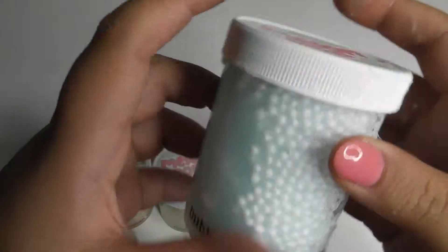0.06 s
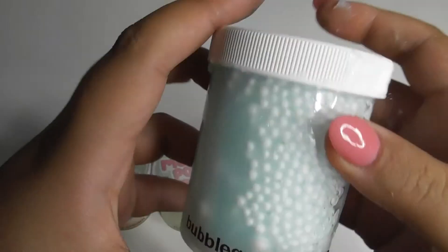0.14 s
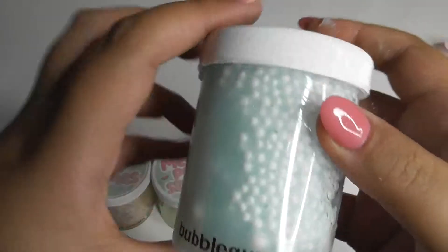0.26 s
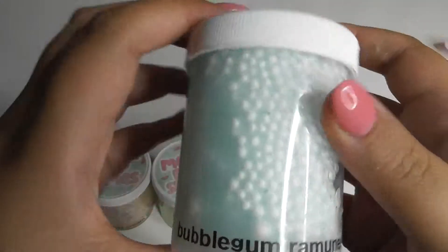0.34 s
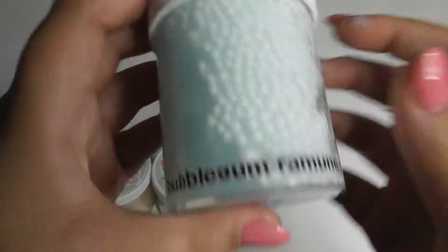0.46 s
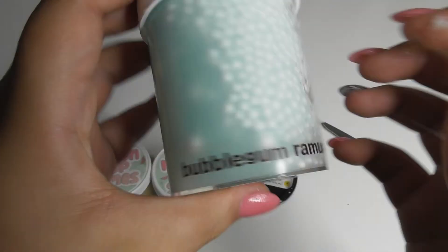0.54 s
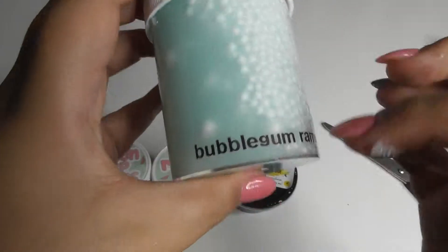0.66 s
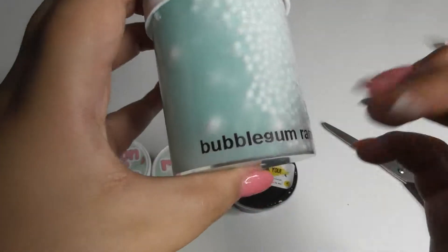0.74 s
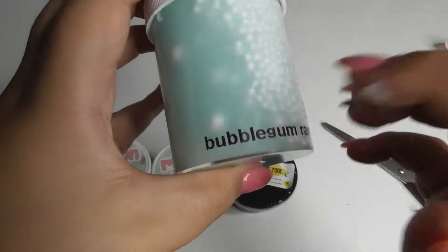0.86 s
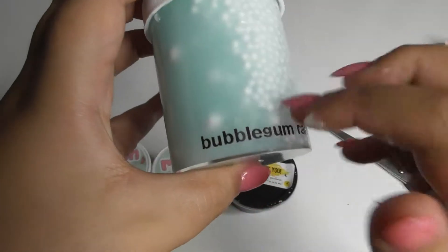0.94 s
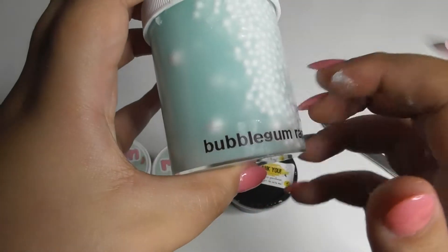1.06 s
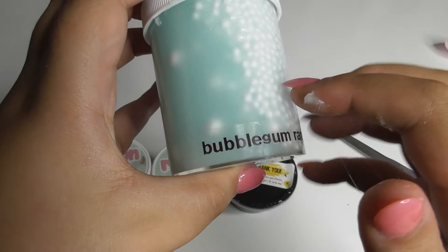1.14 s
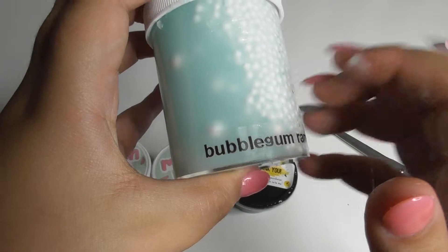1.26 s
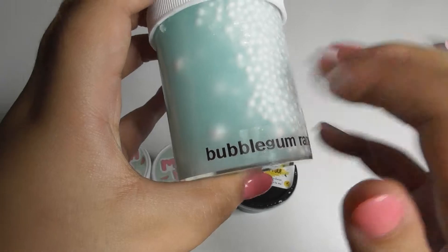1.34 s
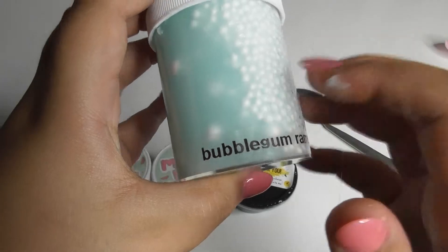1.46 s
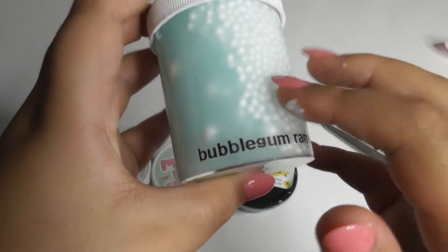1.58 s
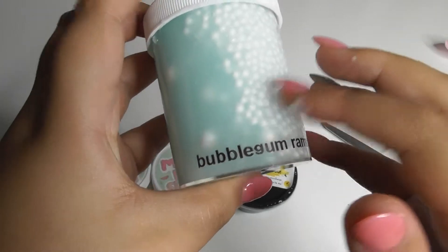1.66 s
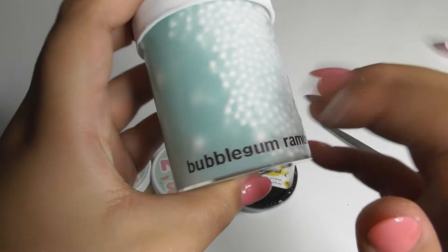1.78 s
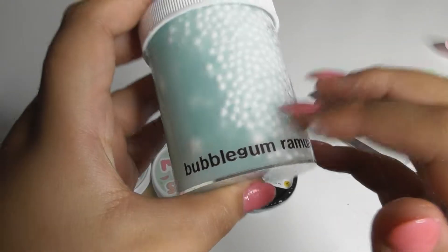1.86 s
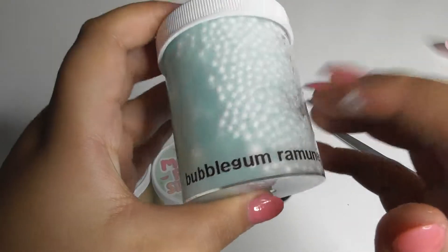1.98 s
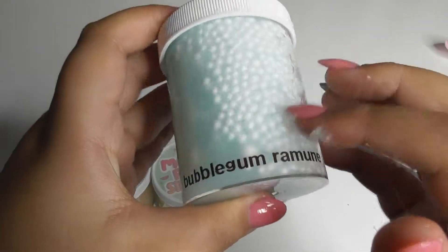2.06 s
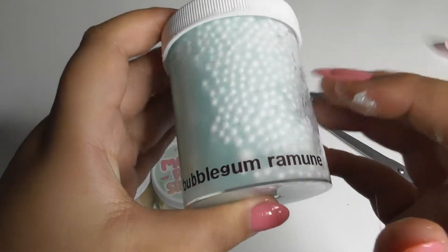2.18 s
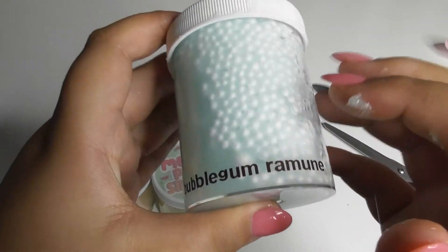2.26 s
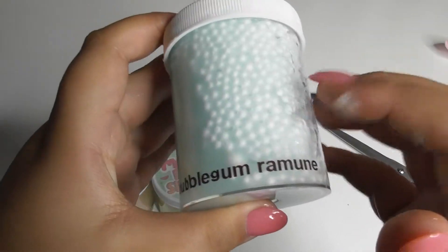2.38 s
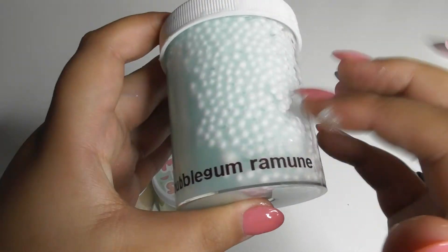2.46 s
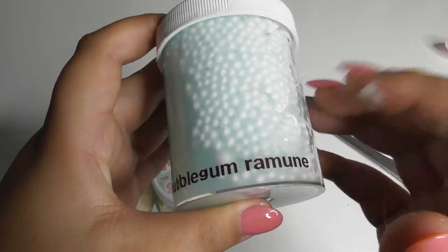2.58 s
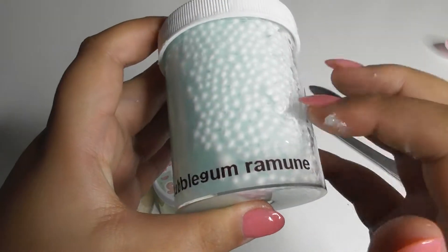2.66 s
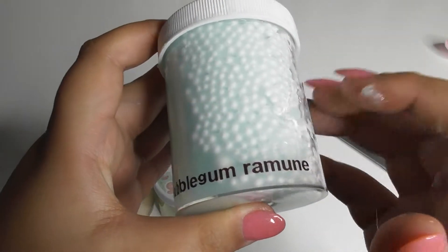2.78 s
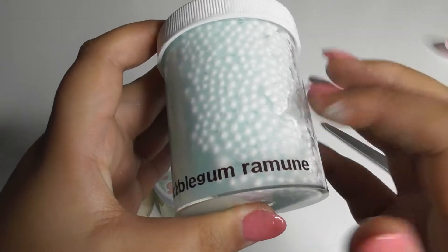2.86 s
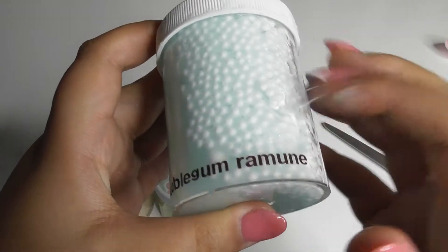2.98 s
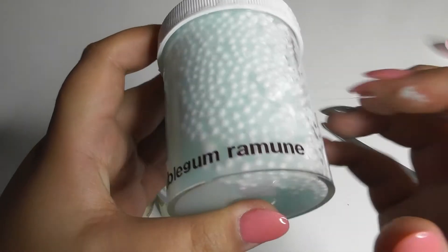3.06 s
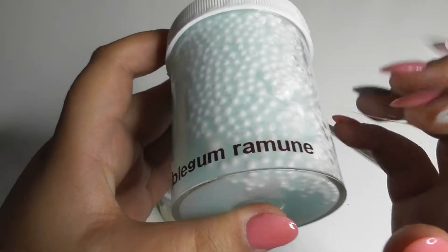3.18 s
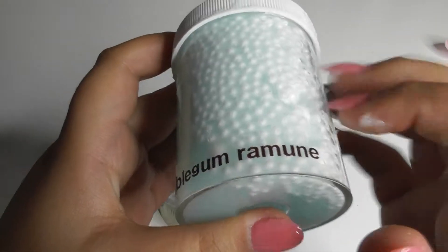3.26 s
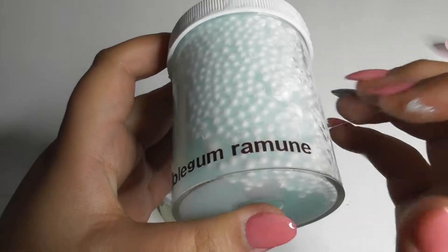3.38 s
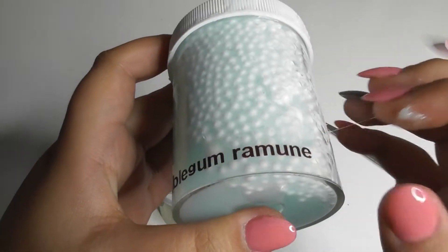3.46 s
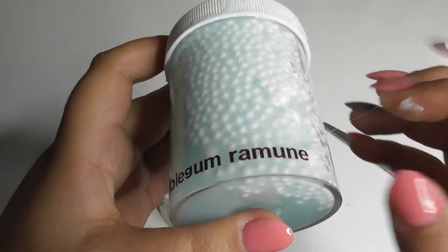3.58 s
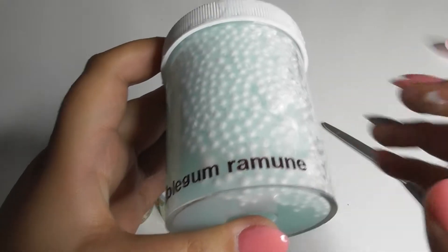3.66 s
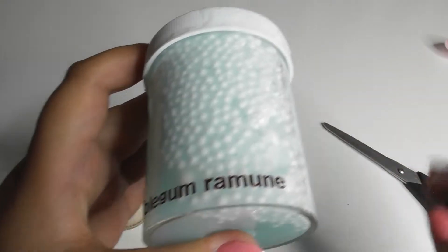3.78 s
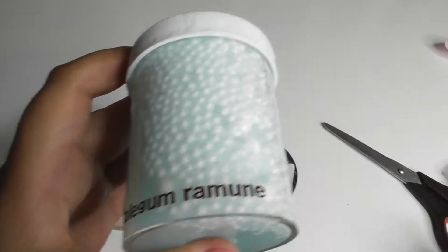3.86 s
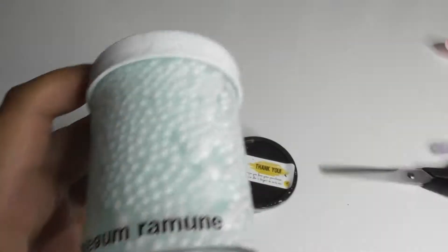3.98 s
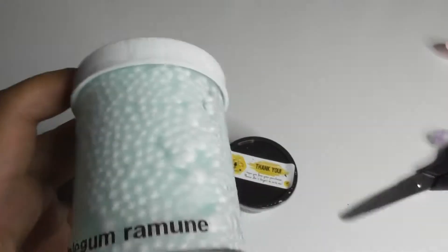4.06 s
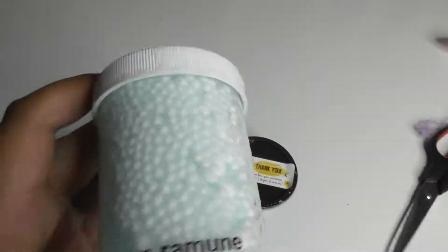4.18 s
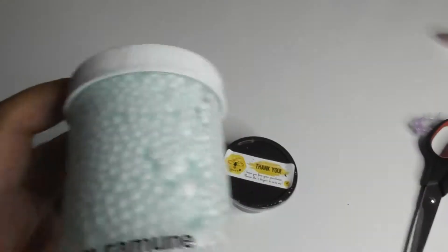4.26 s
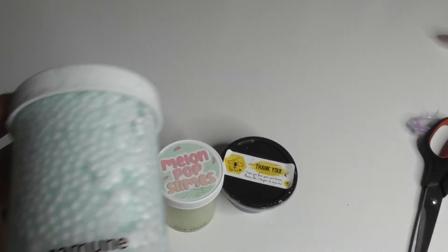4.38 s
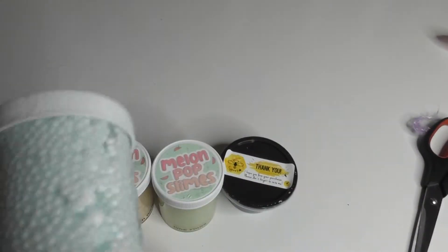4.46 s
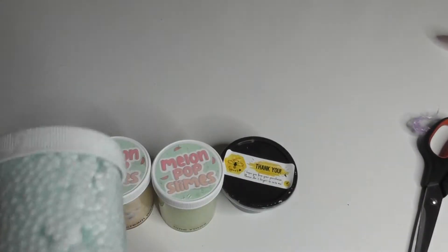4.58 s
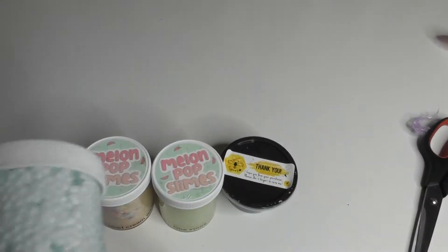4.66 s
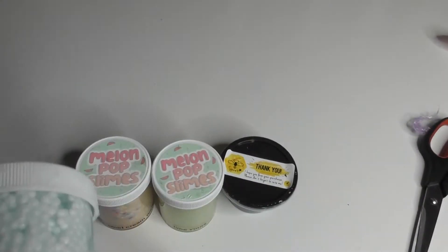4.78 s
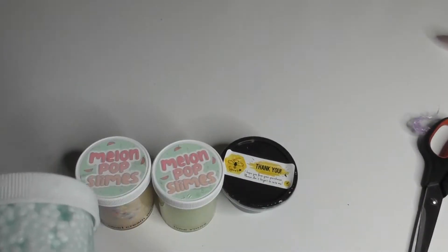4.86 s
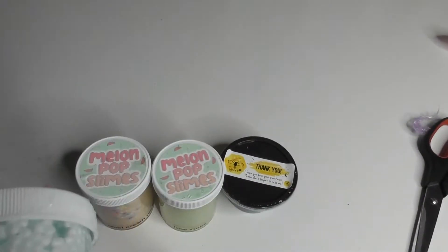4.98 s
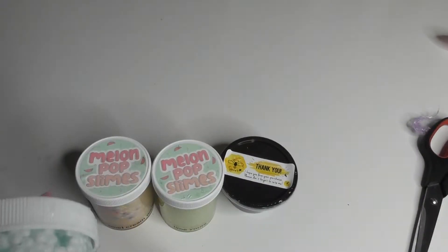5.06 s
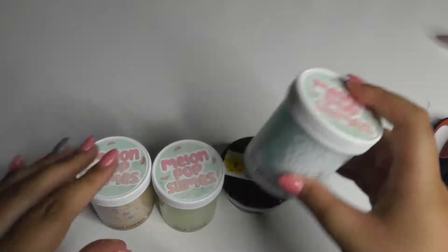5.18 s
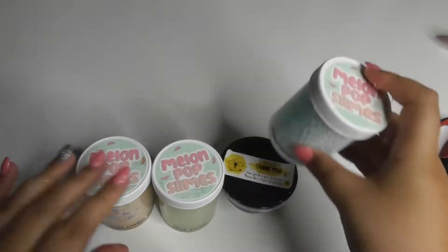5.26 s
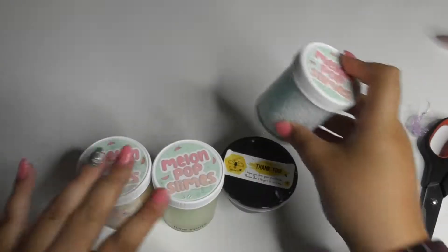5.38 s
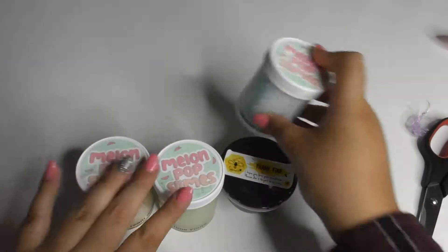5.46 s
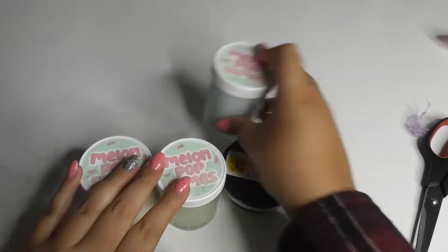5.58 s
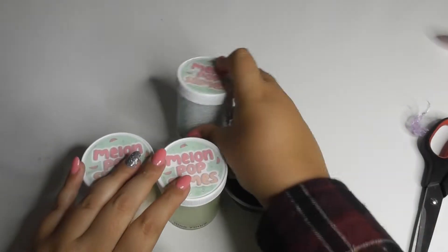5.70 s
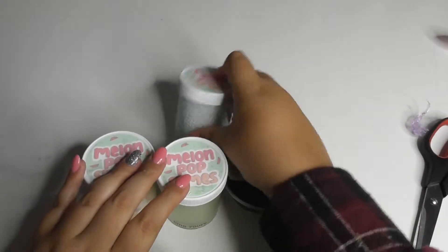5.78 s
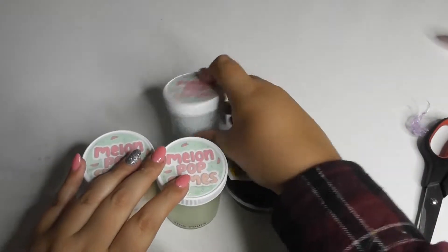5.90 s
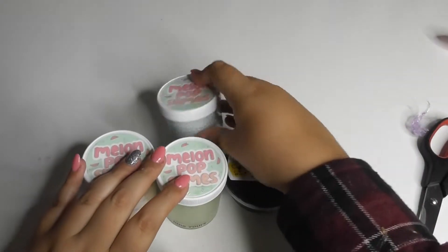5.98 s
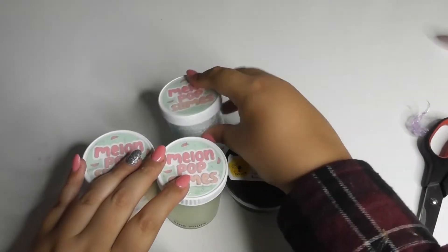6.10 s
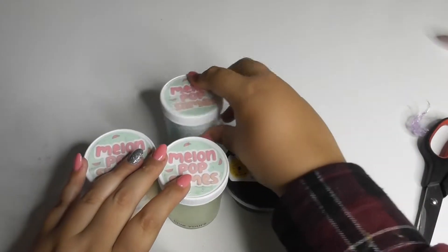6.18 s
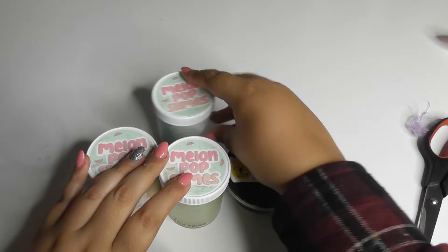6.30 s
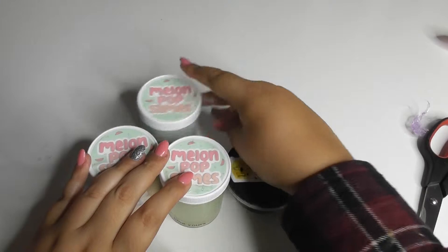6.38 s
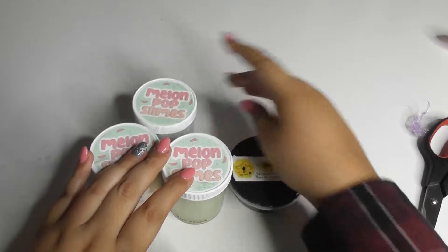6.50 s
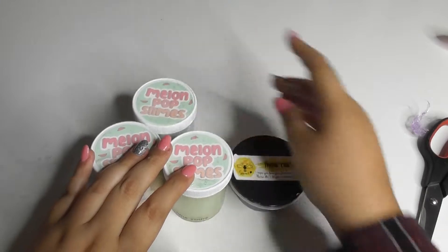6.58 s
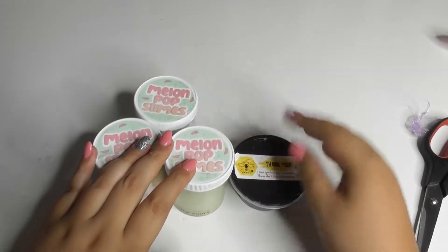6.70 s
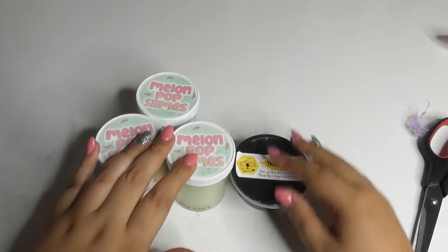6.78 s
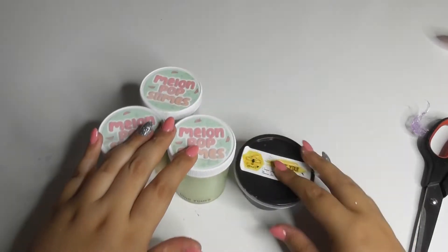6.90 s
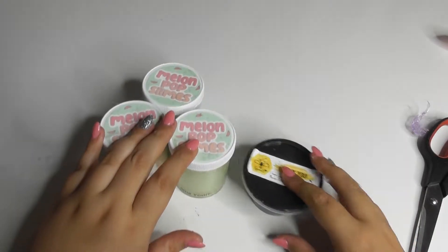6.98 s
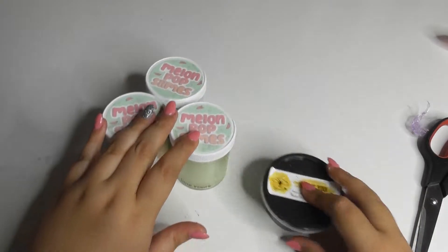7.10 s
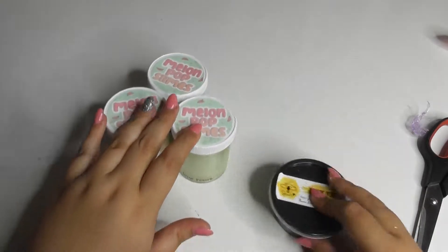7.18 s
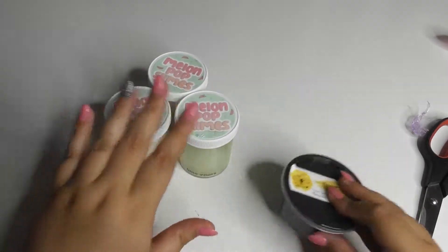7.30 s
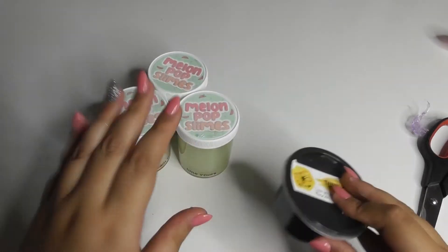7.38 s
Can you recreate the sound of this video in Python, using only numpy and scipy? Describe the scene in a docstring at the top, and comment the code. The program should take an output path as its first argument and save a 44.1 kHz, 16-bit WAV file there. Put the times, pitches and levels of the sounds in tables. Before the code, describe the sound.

In a quiet, faintly humming and hissing room, fingernails tap a filled plastic tub very close to the microphone, with bright irregular ticks and small hollow thuds. Scissors drop on the table with a quick clatter and are scraped aside. After a soft pause, small tubs slide and bump, one landing with a clear knock. Finally a wide tub drags across and judders to a boomy stop.

```python
"""A quiet room hums and hisses throughout, with soft rustles of skin and sleeves: filtered, wavering noise.
Fingernails pick at a plastic tub close to a small stereo microphone on a table: ticks, wall rings, thuds.
Scissors clatter down and are pushed aside: impulses excite decaying modes, and coloured noise scrapes.
After a thin squeak, small tubs slide and bump with drones, and one tub is set down with a knock.
Last a wide tub slides and judders to a stop; its stick-slip pulses make the tabletop boom."""
import sys
import numpy as np
from scipy import signal
from scipy.fft import rfft, irfft, next_fast_len
from scipy.io import wavfile

SR = 44100
rng = np.random.default_rng(int(sys.argv[2]) if len(sys.argv) > 2 else 0)


def to_wav(s):
    """Save 16-bit WAV."""
    ch = np.atleast_2d(s).T  # columns
    pcm = np.round(np.clip(ch, -1, 1) * 32767)  # PCM
    wavfile.write(sys.argv[1], SR, pcm.astype(np.int16))


N = 327927
TIME = np.arange(N) / SR


def from_db(db):
    """Decibels to gain."""
    return 10 ** (np.asarray(db) / 20)


def convolve(x, response):
    """Pass a sound through an impulse response."""
    return signal.oaconvolve(x, response)[:len(x)]


def colour(x, spectrum, depth=1):
    """Causal (minimum-phase) filter that follows (f/Hz, level/dB) points, levels scaled by depth."""
    hz, db = np.transpose(spectrum)
    size = 4096
    grid = np.maximum(np.fft.rfftfreq(size, 1 / SR), 1)
    level_db = depth * np.interp(np.log(grid), np.log(hz), db)
    cepstrum = irfft(np.log(from_db(level_db)))
    # folding the cepstrum forward makes the phase minimal
    cepstrum[1:size // 2] *= 2
    cepstrum[size // 2 + 1:] = 0
    return convolve(x, irfft(np.exp(rfft(cepstrum))))


def low_pass(x, hz):
    """Two-pole low-pass: softens a contact or darkens a sound."""
    sections = signal.butter(2, min(hz, SR / 2 - 1), fs=SR, output="sos")
    return signal.sosfilt(sections, x + 1e-18)


def resonance(x, hz, width_hz):
    """Two-pole band-pass with gain about 1 at its peak."""
    r = np.exp(-np.pi * width_hz / SR)
    feed = np.array([1, 0, -1]) * (1 - r * r) / 2
    feedback = [1, -2 * r * np.cos(2 * np.pi * hz / SR), r * r]
    return signal.lfilter(feed, feedback, x + 1e-18)


def rms_one(x):
    """Scale to rms 1."""
    return x / np.sqrt(np.mean(x ** 2) + 1e-20)


def drift(rate):
    """Random wander of rms 1, with `rate` new targets per second."""
    knots = rng.standard_normal(int(rate * N / SR) + 2)
    return rms_one(np.interp(TIME * rate, np.arange(len(knots)), knots))


def noise(flicker_db, rate):
    """White noise whose strength flickers."""
    return rng.standard_normal(N) * from_db(flicker_db * drift(rate))


def impulse(db):
    """One click at the head of a short stretch of silence."""
    return from_db(db) * signal.unit_impulse(SR // 10)


def add(track, s, sound):
    """Mix a sound in at time s."""
    at = max(round(s * SR), 0)
    track[at:at + len(sound)] += sound[:N - at]


def held(start, end, attack_s, release_s):
    """Envelope that rises, holds until the end time and dies away."""
    rise = np.clip((TIME - start) / attack_s, 0, 1)
    return rise * np.exp(-np.clip((TIME - end) / release_s, 0, 20))


# left-minus-right level at the microphone ports, before depth: (f/Hz, level/dB)
PORT_DIFFERENCE = [(35, -9.5), (70, -11), (115, -13), (200, -8), (380, -7), (700, 0.5), (1290, 1.5),
                   (4000, 0.5), (9000, 0), (16000, 5.5)]


def ports(x, depth):
    """Split to stereo: bass reaches the right port more strongly than the left."""
    left = colour(x, PORT_DIFFERENCE, depth / 2)
    right = colour(x, PORT_DIFFERENCE, -depth / 2)
    return np.array([left, right])


# course of the low room noise, before trim: (t/s, level/dB)
ROOM_NOISE_LEVEL = [(0.0, -47.5), (1.25, -50), (1.5, -55), (2.0, -58), (2.75, -53), (3.25, -57),
                    (3.8, -52.5), (4.45, -56.5), (5.4, -52), (6.05, -55)]
# spectrum of the low room noise: (f/Hz, level/dB)
RUMBLE_SPECTRUM = [(25, -3), (50, 9.5), (120, 2.5), (220, 0), (500, -2.5), (1000, -7), (1550, -20),
                   (2300, -23.5), (3200, -39.5), (7000, -32.5)]
# spectrum of the thin hiss: (f/Hz, level/dB)
AIR_SPECTRUM = [(1000, -15), (2500, 7.5), (4000, -0.5), (8000, -7.5), (12000, -4), (16000, -5)]


def background(rumble_db=2, hiss_db=-66, hiss_follows=.7, apart_db=-14):
    """Low room noise and a thin hiss waver slowly together, nearly alike in both channels."""
    s, db = np.transpose(ROOM_NOISE_LEVEL)
    low_db = np.interp(TIME, s, db)
    rumble = rms_one(colour(noise(flicker_db=-0.02, rate=14), RUMBLE_SPECTRUM))
    # a weak noise of opposite sign in the two channels
    apart = rms_one(colour(rng.standard_normal(N), RUMBLE_SPECTRUM)) * np.array([[1], [-1]])
    low = ports(rumble, depth=0.81) + from_db(apart_db) * apart
    hiss = rms_one(colour(noise(flicker_db=2.75, rate=8.8), AIR_SPECTRUM))
    hiss_level_db = hiss_db + hiss_follows * (low_db - db.mean())
    return from_db(rumble_db + low_db) * low + from_db(hiss_level_db) * hiss


# skin and sleeves brush softly while the hands move: (start t/s, end t/s, level/dB before trim)
HAND_RUSTLES = [(-0.1, 0.27, -54), (0.3, 1.667, -60.5), (2.12, 3.023, -57.5), (3.62, 3.913, -67),
                (4.402, 5.152, -58.5), (5.137, 5.543, -62)]
# spectrum of the brushing: (f/Hz, level/dB)
BRUSH_SPECTRUM = [(1000, -17), (2500, 4), (4000, -1.5), (8000, -3.5), (11000, -2), (16000, -6.5)]
# a fingertip squeaks faintly on a lid: (start t/s, end t/s, level/dB)
LID_SQUEAKS = [(5.24, 5.43, -72)]
RUSTLE_ATTACK_S, RUSTLE_RELEASE_S = 0.068, 0.016
SQUEAK_HZ, SQUEAK_WIDTH_HZ = 8000, 800   # width of each of two passes


def hands(rustle_db=-5):
    """Skin and cloth make wavering, coloured noise; the squeak is noise through a narrow resonance."""
    motion = sum(from_db(db + rustle_db) * held(start, end, RUSTLE_ATTACK_S, RUSTLE_RELEASE_S)
                 for start, end, db in HAND_RUSTLES)
    rustle = motion * rms_one(colour(noise(flicker_db=2.0, rate=28), BRUSH_SPECTRUM))
    grip = sum(from_db(db) * held(start, end, RUSTLE_ATTACK_S, RUSTLE_RELEASE_S)
               for start, end, db in LID_SQUEAKS)
    squeak = resonance(rng.standard_normal(N), SQUEAK_HZ, SQUEAK_WIDTH_HZ)
    squeak = resonance(squeak, SQUEAK_HZ, SQUEAK_WIDTH_HZ)
    return rustle + grip * rms_one(squeak)


def tick(db, hz, width_hz=2300, rim_hz=3900, rim_width_hz=700, rim_db=-15):
    """A hard contact rings for a few cycles in the treble, with a randomly varied lower partner."""
    detune, strength = rng.standard_normal(2)
    rim_hit = impulse(db + rim_db + 3.4 * strength)
    rim = resonance(rim_hit, rim_hz * (1 + 0.075 * detune), rim_width_hz)
    return resonance(impulse(db), hz, width_hz) + rim


# spectrum of the plastic wall's scattered ring: (f/Hz, level/dB)
SHELL_SPECTRUM = [(1000, -17.5), (2500, -17), (4000, -3.5), (6500, -0.5), (8500, -2.5), (12000, 0.5),
                  (16000, -7)]


def shell(db, t60):
    """The thin plastic wall scatters a blow into a brief dense ring, new at every touch."""
    t = TIME[:SR // 10]
    ring = colour(rng.standard_normal(len(t)) * from_db(-60 * t / t60), SHELL_SPECTRUM)
    return from_db(db) * ring / np.linalg.norm(ring)


# nail on the tub, levels before trim: (t/s, click level/dB, ring f/Hz, rim level/dB re click,
# nail overtone level/dB re click, wall thud level/dB)
NAIL_TAPS = [(0.127, -21, 8000, 5, -12, -27), (0.1577, 1, 8900, -16, -8, -8.5),
             (0.419, -22, 8900, -15, -7, -27), (0.4515, -18.5, 8510, -8, -2, -20),
             (0.8103, -19.5, 7930, -9, -9, -16), (0.9964, 11, 9500, -36, -22, -11),
             (1.0833, 9.5, 8200, -6.5, -23, 11.5), (1.1912, 7.5, 9200, -13, -12, -10),
             (1.339, 8, 8850, -4.5, -20, -4.5), (1.3443, -3, 8550, -6, -15, -12),
             (1.4261, 11.5, 9200, -19, -14, -8.5), (1.5214, -3.5, 8600, -6.5, -18, -9),
             (1.6224, 11, 8980, -19, -15, -13.5), (1.869, 11, 9570, -29, -21, -13.5),
             (1.9533, -8.5, 7800, -1.5, -20, -13.5), (1.9665, -1, 8730, -13, -19, -16),
             (2.099, 0, 8600, -9, -19, -34), (2.177, 4.5, 8950, -13.5, -6.5, -14),
             (2.338, -2.5, 7900, -4, -14, -12.5), (2.3718, 0.5, 7400, -8, -6, -12),
             (2.4768, -0.5, 9240, -5, -11, -23), (2.5762, 7, 7460, -7.5, -6, -4),
             (2.5894, 2.5, 9800, -20, -13, -9.5), (2.7032, -5.5, 8200, -3, -8, -15.5),
             (2.7849, -1, 9050, -7.5, -14, -12.5), (2.7903, 2, 7300, -4, -9, -12),
             (3.0274, -25, 8700, -15, -9, -23), (3.312, 12, 7160, -38, -0.5, 9),
             (3.323, 11, 8850, -24, -1, 0.5)]
# spectrum of the wall thud: (f/Hz, level/dB)
WALL_SPECTRUM = [(60, -23), (250, -9), (560, 6.5), (950, 2), (1400, -10.5), (2200, -41.5), (6000, -55.5)]


def nails(click_db=-1.5, thud_db=-1, ring_db=-21, crack_db=-16, ring_share=0.16):
    """Each nail tap ticks sharply and thuds in the tub; more thud against click also rings the wall more."""
    out = np.zeros(N)
    for s, db, hz, rim_db, overtone_db, wall_db in NAIL_TAPS:
        click = tick(db + click_db, hz, width_hz=1600, rim_db=rim_db, rim_width_hz=720)
        ring = shell(db + ring_db + ring_share * (wall_db - db), t60=0.047)
        crack = shell(db + crack_db, t60=0.008)
        overtone = resonance(impulse(db + overtone_db), 12300, 2300)
        thud = colour(impulse(wall_db + thud_db), WALL_SPECTRUM)
        add(out, s, click + ring + crack + overtone + thud)
    return out


# the crowd of weaker modes in a struck body: (f/Hz, level/dB)
CROWD_SPECTRUM = [(50, -13.5), (130, 13.5), (400, 6), (900, -5), (1250, -11), (1700, -17), (3000, -31),
                  (6000, -19), (16000, -23.5)]


def body(modes, crowd_db, crowd_t60, lowest_hz=65):
    """Impulse response of a struck body: clear modes over a crowd of weak ones, with little deep bass."""
    t = TIME[:SR // 2]
    clear = sum((-1) ** k * from_db(db - 60 * t / t60) * np.sin(2 * np.pi * hz * t)
                for k, (hz, db, t60) in enumerate(modes))
    crowd = rms_one(colour(rng.standard_normal(len(t)), CROWD_SPECTRUM))
    crowd = crowd * from_db(crowd_db - 60 * t / crowd_t60)
    return signal.sosfilt(signal.butter(2, lowest_hz, "high", fs=SR, output="sos"), clear + crowd)


SPEED_WOBBLE, WOBBLE_PER_S = 0.12, 30   # wobble is the rms of log speed


def speed(start, fastest, rest):
    """Speed of one push, about 1 at its fastest; a hand never pushes quite evenly."""
    even = np.interp(TIME, [start, fastest, rest], [0, 1, 0])
    return even * np.exp(SPEED_WOBBLE * drift(WOBBLE_PER_S))


def friction_gains(pushes, scrape_power, hiss_power):
    """Scrape and hiss each grow as a power of speed, the hiss more steeply: fast sliding is brighter."""
    scrape, hiss = np.zeros(N), np.zeros(N)
    for start, fastest, rest, scrape_db, hiss_db in pushes:
        pace = speed(start, fastest, rest)
        moving = pace > 0
        # overlapping pushes add in power
        scrape[moving] += (from_db(scrape_db) * pace[moving] ** scrape_power) ** 2
        hiss[moving] += (from_db(hiss_db) * pace[moving] ** hiss_power) ** 2
    return np.sqrt(scrape), np.sqrt(hiss)


# spectrum of friction hiss: (f/Hz, level/dB)
HISS_SPECTRUM = [(1000, -21), (2500, 6), (4000, -1.5), (8000, -2.5), (11000, 0.5), (16000, -17)]


def grit(per_s, spread_db, smooth_db, patchy_db, patches_per_s=45):
    """Friction hiss: random snags of uneven size over a smooth bed, in rougher and smoother patches."""
    sizes = from_db(spread_db * np.minimum(rng.exponential(1, N), 3)) * rng.choice([-1, 1], N)
    snags = rms_one(sizes * (rng.random(N) < per_s / SR))
    bed = from_db(smooth_db) * rng.standard_normal(N)
    patches = from_db(patchy_db * drift(patches_per_s))
    return rms_one(patches * colour(snags + bed, HISS_SPECTRUM))


# scissors meeting the table: (t/s, blow level/dB, thump level/dB before trim, tick level/dB)
SCISSOR_CONTACTS = [(3.9264, -4, -2.5, 5), (3.929, 5.5, -5.5, 3.5), (3.9346, -25, -24, 5),
                    (3.938, -21, -14, -2), (3.946, -29, -24, -24), (3.968, -17, -19, -27),
                    (3.9977, -25, -25, -19), (4.008, -16.5, -22, -20), (4.0359, -18, -52, -26),
                    (4.045, -34, -50, -10.5), (4.147, -29, -57, -19)]
# ringing of the struck scissors: (f/Hz, level/dB, t60/s)
SCISSOR_RING_MODES = [(123.5, -26, 0.17), (259, -17, 0.052), (293.7, -27.5, 0.28), (521, -20.5, 0.16),
                      (590, -23.5, 0.14), (752, -26, 0.086), (863, -22.5, 0.11), (1000, -13.5, 0.023),
                      (1130, -28, 0.03), (1272, -25, 0.064), (1490, -38.5, 0.062)]
# pushes gather speed, then slow to rest, levels before trim:
# (start t/s, fastest t/s, rest t/s, scrape level/dB, hiss level/dB)
SCISSOR_PUSHES = [(3.945, 3.995, 4.06, -37.5, -40), (4.0, 4.14, 4.386, -39, -47.5)]
# spectrum of the blade scrape: (f/Hz, level/dB)
BLADE_SPECTRUM = [(25, -32.5), (70, -3.5), (200, -2), (800, -8), (1250, -10.5), (1700, -22.5), (2300, -34),
                  (3000, -24), (6000, -29)]
# resonances that ring in the scrape: (f/Hz, width f/Hz, level/dB)
BLADE_RESONANCES = [(293, 11, 16.5), (503, 39, 13.5), (735, 76, 9), (1126, 51, 2)]


def scissors(thump_hz=130, thump_db=29, scrape_db=1, hiss_db=-5):
    """The scissors land in several quick contacts, then ring faintly as they are pushed along."""
    blows, direct = np.zeros(N), np.zeros(N)
    for s, db, weight_db, tick_db in SCISSOR_CONTACTS:
        add(blows, s, impulse(db))
        thump = low_pass(impulse(weight_db + thump_db), thump_hz)
        add(direct, s, tick(tick_db, hz=7700, width_hz=3400) - thump)
    clatter = convolve(blows, body(SCISSOR_RING_MODES, crowd_db=-20.5, crowd_t60=0.14))
    friction = colour(noise(flicker_db=1.0, rate=110), BLADE_SPECTRUM)
    ringing = friction + sum(from_db(db) * resonance(friction, hz, width)
                             for hz, width, db in BLADE_RESONANCES)
    scrape_gain, hiss_gain = friction_gains(SCISSOR_PUSHES, scrape_power=0.53, hiss_power=1.0)
    scrape = from_db(scrape_db) * scrape_gain * rms_one(ringing)
    fine = grit(per_s=780, spread_db=3.5, smooth_db=-1.0, patchy_db=0.1)
    return clatter + direct + scrape + from_db(hiss_db) * hiss_gain * fine


# modes of the booming tabletop: (f/Hz, level/dB, t60/s)
TABLETOP_MODES = [(115.8, -16, 0.21), (182.3, -23, 0.24), (291, -18.5, 0.22), (416.3, -15, 0.14),
                  (480, -48, 0.1), (601, -28, 0.054), (708, -5.5, 0.024), (852, -14, 0.068),
                  (1059, -15.5, 0.07), (1230, -17.5, 0.068), (1510.3, -31, 0.062)]


def tabletop():
    """Impulse response of the table: low modes ring longest, over a crowd of weaker ones."""
    return body(TABLETOP_MODES, crowd_db=-11, crowd_t60=0.15)


def rub(gains, spectrum, table, scrape_db, table_db, hiss_db):
    """Plastic rubs over the tabletop: a hollow scrape that also stirs the table modes, and a fine hiss."""
    scrape_gain, hiss_gain = gains
    friction = rms_one(colour(noise(flicker_db=1.8, rate=110), spectrum))
    stirred = rms_one(convolve(friction, table))
    hollow = rms_one(friction + from_db(table_db) * stirred)
    hiss = grit(per_s=6000, spread_db=8, smooth_db=1.0, patchy_db=.6)
    return from_db(scrape_db) * scrape_gain * hollow + from_db(hiss_db) * hiss_gain * hiss


# pushes of the small tubs, then of the wide tub, levels before trim:
# (start t/s, fastest t/s, rest t/s, scrape level/dB, hiss level/dB)
SMALL_TUB_PUSHES = [(5.52, 5.575, 5.67, -41.5, -55.5), (5.615, 5.665, 5.8, -42.5, -48),
                    (5.68, 5.785, 5.85, -43, -51.5), (6.125, 6.16, 6.23, -47, -71),
                    (6.197, 6.247, 6.28, -32.5, -36.5), (6.3, 6.335, 6.43, -39.5, -50),
                    (6.36, 6.455, 6.52, -38, -43), (6.47, 6.5, 6.7, -45.5, -56)]
WIDE_TUB_PUSHES = [(6.63, 6.84, 7.014, -38.5, -51), (6.84, 7.11, 7.355, -32.5, -41)]
# scrape spectra of the small tubs and the wide tub: (f/Hz, level/dB)
SMALL_TUB_SPECTRUM = [(25, -51), (60, -24), (130, -8), (250, 3), (550, -1.5), (740, 2), (900, -4.5),
                      (1100, -2.5), (1500, -15.5), (2200, -16.5), (3000, -23.5), (6000, -41)]
WIDE_TUB_SPECTRUM = [(25, -42), (60, -30), (130, -15), (210, -3), (420, 0.5), (550, -2.5), (700, 1.5),
                     (1000, -8.5), (1550, -16), (2200, -18), (3000, -24), (6000, -38.5)]
# slow sliding sets the table droning: (start t/s, end t/s, level/dB before trim)
TABLE_DRONES = [(5.66, 5.786, -36), (6.464, 6.732, -43.5), (7.031, 7.15, -36.5)]
DRONE_ATTACK_S, DRONE_RELEASE_S = 0.021, 0.041


def tub_slides(table, drone_db=-0.5, drone_hz=116, drone_width_hz=24):
    """Sliding tubs scrape, and their chatter keeps the lowest table mode droning unevenly."""
    small_gains = friction_gains(SMALL_TUB_PUSHES, scrape_power=0.54, hiss_power=1.07)
    small = rub(small_gains, SMALL_TUB_SPECTRUM, table, scrape_db=1.5, table_db=-10, hiss_db=-5.5)
    wide_gains = friction_gains(WIDE_TUB_PUSHES, scrape_power=0.55, hiss_power=1.03)
    wide = rub(wide_gains, WIDE_TUB_SPECTRUM, table, scrape_db=1.5, table_db=-17, hiss_db=-3.5)
    drone = resonance(rng.standard_normal(N), drone_hz, drone_width_hz)
    drone = resonance(drone, drone_hz, drone_width_hz)
    limited = np.tanh(2 * rms_one(drone))   # friction limits the swing
    drone = rms_one(resonance(limited, drone_hz, 50))
    swing = sum(from_db(db + drone_db) * held(start, end, DRONE_ATTACK_S, DRONE_RELEASE_S)
                for start, end, db in TABLE_DRONES)
    return small + wide + swing * drone


# stick-slip bursts of the wide tub: (start t/s, end t/s, slip rate name, level/dB before trim)
JUDDER_BURSTS = [(7.2, 7.24, "low", -15), (7.228, 7.277, "high", -12.5), (7.289, 7.306, "low", -15),
                 (7.331, 7.355, "low", -20)]
# slip rates lie close to the two lowest table modes: name to mean f/Hz
SLIP_RATES = {"low": 117, "high": 177}
JUDDER_ATTACK_S, JUDDER_RELEASE_S = 0.0095, 0.0094


def judder(slip_hz=260, slip_db=-5, groan_db=-9, overtone_db=-14, unevenness=0.023):
    """The wide tub judders to a stop: each slip pushes the table, and the top groans at the slip rate."""
    slips, groan = np.zeros(N), np.zeros(N)
    clock = np.cumsum(1 + unevenness * drift(90)) / SR   # runs unevenly, so the slip rate wavers
    for start, end, mode, db in JUDDER_BURSTS:
        turns = SLIP_RATES[mode] * (clock - np.interp(start, TIME, clock))
        strength = from_db(db) * held(start, end, JUDDER_ATTACK_S, JUDDER_RELEASE_S)
        slips += np.diff(np.floor(turns), prepend=0) * strength   # one pulse per turn
        phase = 2 * np.pi * turns
        groan += strength * (np.sin(phase) + from_db(overtone_db) * np.sin(2 * phase))
    return from_db(slip_db) * low_pass(slips, slip_hz), from_db(groan_db) * groan


# tubs meeting the table: (t/s, blow level/dB, contact cut-off f/Hz, tick level/dB)
TUB_CONTACTS = [(5.554, -20.5, 202, -47), (5.598, -21, 400, -40), (5.807, -10, 417, -29),
                (5.835, -42, 911.6, -61), (5.848, 2.5, 2630, -5), (6.275, -9.5, 890, -26.5),
                (6.286, -16, 300, -42), (6.298, -22, 160, -48), (6.529, -17.5, 150, -47),
                (6.599, -26, 140, -53), (6.688, -21.5, 150, -50), (7.203, -4, 179, -29),
                (7.334, -4, 139, -36)]


def tub_bumps(table):
    """Tubs land, jolt and judder: softened blows and slips drive the table modes, with ticks on top."""
    force, ticks = np.zeros(N), np.zeros(N)
    for s, db, contact_hz, tick_db in TUB_CONTACTS:
        add(force, s, low_pass(impulse(db), contact_hz))
        contact = tick(tick_db, hz=7260, width_hz=6400, rim_hz=2700, rim_width_hz=1400, rim_db=12.5)
        add(ticks, s, contact)
    slips, groan = judder()
    return convolve(force + slips, table) + groan + ticks


# spectrum of the room tails: (f/Hz, level/dB)
ROOM_SPECTRUM = [(100, 0), (1000, 4), (3000, 2.5), (5500, 4), (7000, 3), (8700, -5.5), (12000, -2.5),
                 (16000, -2.5)]


def room(x, apart, t60, build_s=0.0029):
    """A short diffuse tail that builds up, then decays, partly shared by the two close ports."""
    t = TIME[:SR // 2]
    envelope = from_db(-60 * t / t60) * (1 - np.exp(-t / build_s))
    shared, left, right = rng.standard_normal((3, len(t))) * envelope
    tails = [shared + apart * own for own in (left, right)]
    return np.array([convolve(side, colour(tail / np.linalg.norm(tail), ROOM_SPECTRUM))
                     for side, tail in zip(x, tails)])


def left_leads(pair, phases, depth):
    """Turn the phase between the two ports, following (f/Hz, lead/rad) points scaled by depth."""
    hz, radians = np.transpose(phases)
    size = next_fast_len(N)
    lead = depth * np.interp(np.fft.rfftfreq(size, 1 / SR), hz, radians)
    turn = np.exp(1j * lead * np.array([[.5], [-.5]]))
    return irfft(rfft(pair, size) * turn, size)[:, :N]


# the top treble of close sounds reaches the left port first: (f/Hz, lead/rad before depth)
TREBLE_LEFT_LEAD = [(8800, 0), (10300, 0.66), (12700, 1.4), (16000, 1.1)]
# bass from the table reaches the left port first: (f/Hz, lead/rad before depth)
BASS_LEFT_LEAD = [(0, 0), (110, .3), (190, .7), (400, 0.18), (1100, 0.26), (2200, 0)]
ROOM_T60_S, ROOM_DB = 0.31, -22   # ROOM_DB sends the nail taps to the room


def scene(table_room_db=-17, near_walls_db=-13):
    """Nail taps and table sounds share one room; hand rustle and background are mixed in dry."""
    noises = background()
    rustles = ports(hands(), depth=.6)
    taps = left_leads(ports(nails(), depth=0.75), TREBLE_LEFT_LEAD, depth=0.83)
    taps = taps * from_db([[-.6], [.6]])   # a little louder on the right
    blades = left_leads(ports(scissors(), depth=0.98), TREBLE_LEFT_LEAD, depth=0.98)
    table = tabletop()
    tubs = ports(tub_slides(table) + tub_bumps(table), depth=0.95)
    on_table = left_leads(tubs + blades, BASS_LEFT_LEAD, depth=1.1)
    sends = from_db(ROOM_DB) * taps + from_db(table_room_db) * on_table
    tails = room(sends, apart=0.18, t60=ROOM_T60_S)
    # the wide top radiates from all around the ports
    early = room(low_pass(on_table, 1900), apart=2.05, t60=0.087)
    return on_table + taps + tails + from_db(near_walls_db) * early + rustles + noises


# microphone colour: (f/Hz, level/dB)
MICROPHONE_COLOUR = [(2200, -0.5), (2900, -5.5), (3900, 4.5), (4450, 0.5), (5000, -7), (5600, -1),
                     (6500, 2), (7800, 9), (9500, 5), (12000, 0), (16000, 1)]
CUTOFF_HZ = 16000


def record(dry):
    """The microphone has a notch and a bright peak in the treble; peaks clip and the top is cut."""
    bright = np.clip([colour(side, MICROPHONE_COLOUR) for side in dry], -1, 1)
    top_cut = signal.ellip(10, .1, 80, CUTOFF_HZ, fs=SR, output="sos")
    return signal.sosfilt(top_cut, bright)


dry = scene()
out = record(dry)
to_wav(out)
```